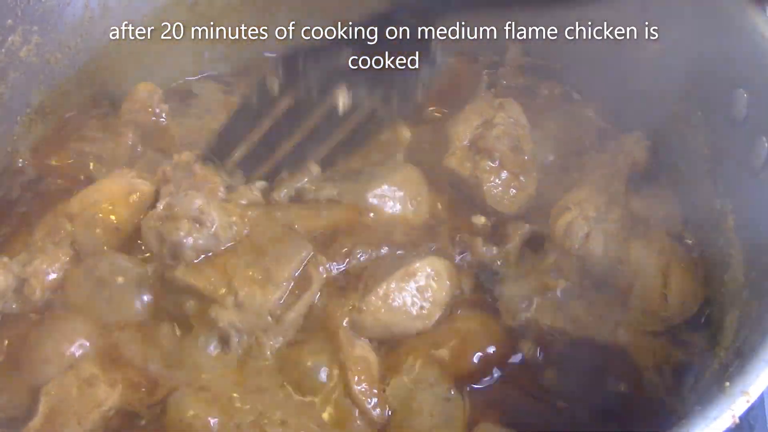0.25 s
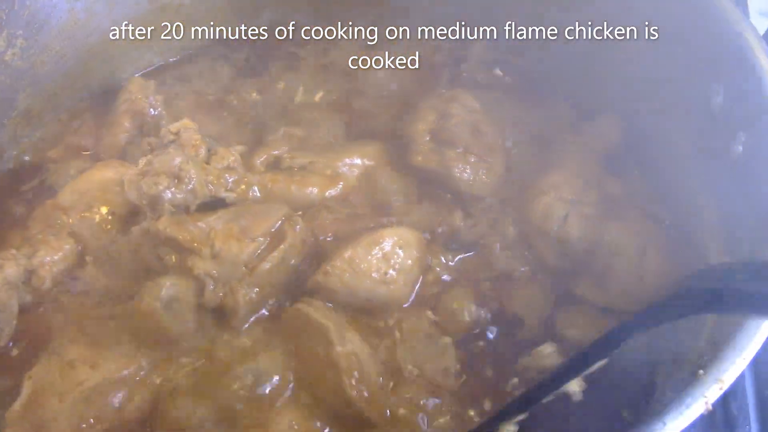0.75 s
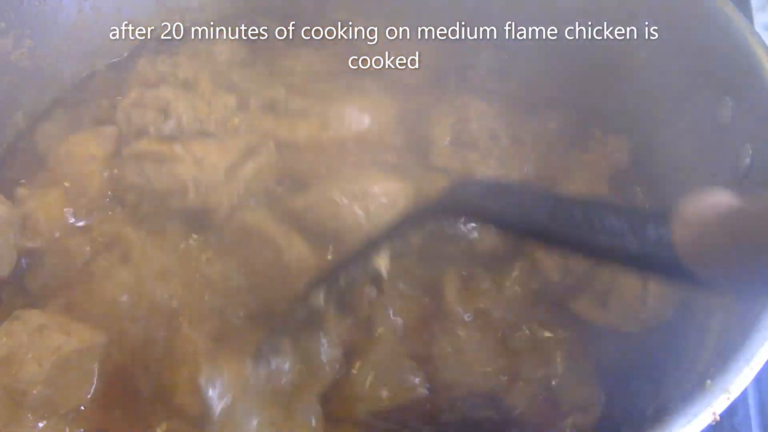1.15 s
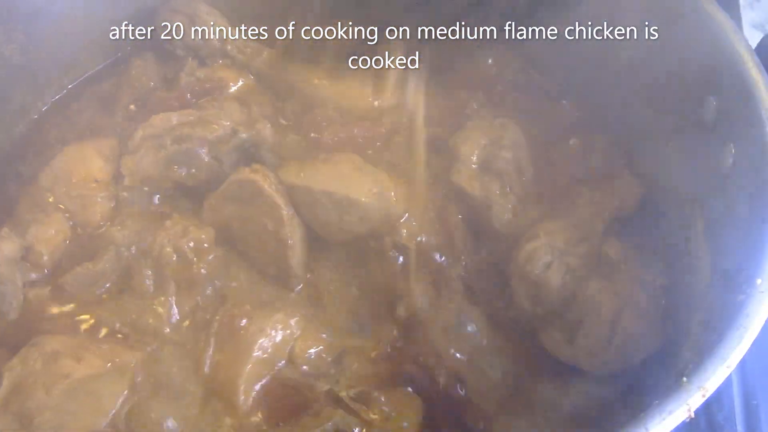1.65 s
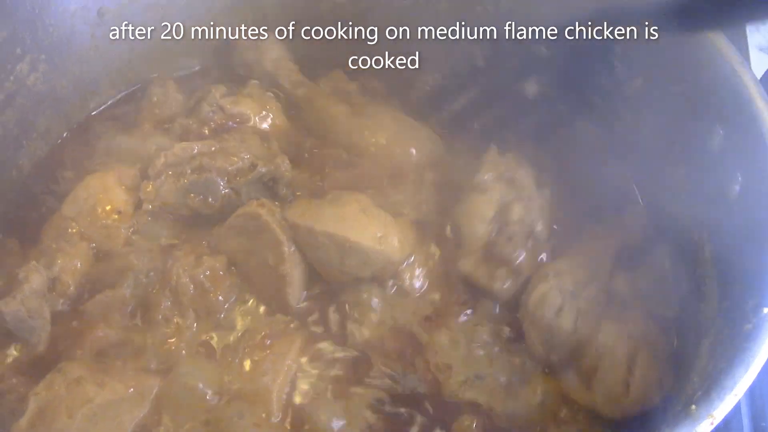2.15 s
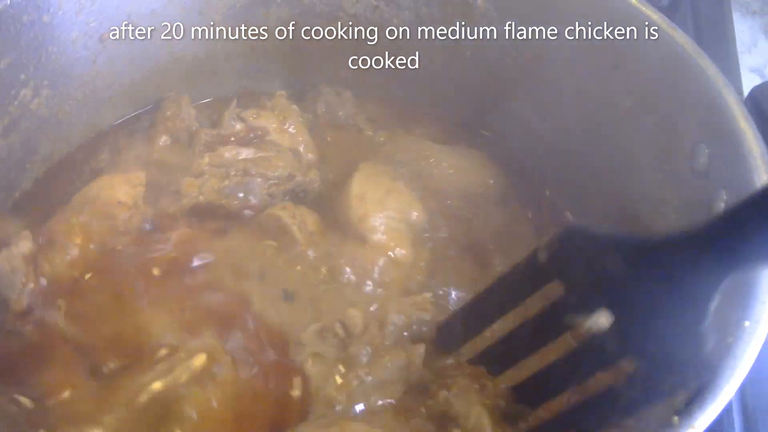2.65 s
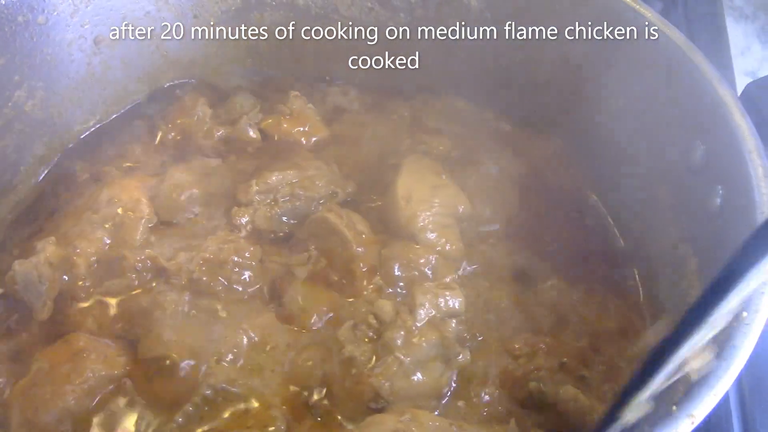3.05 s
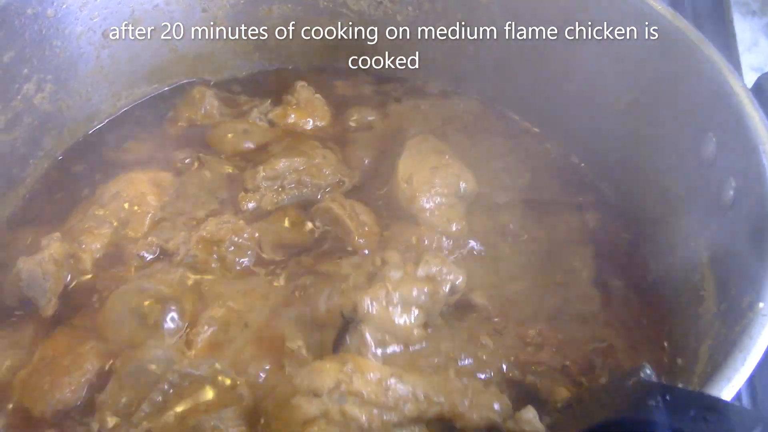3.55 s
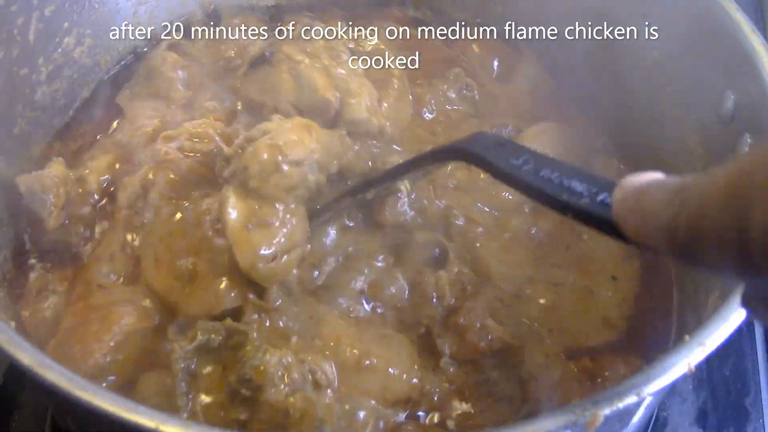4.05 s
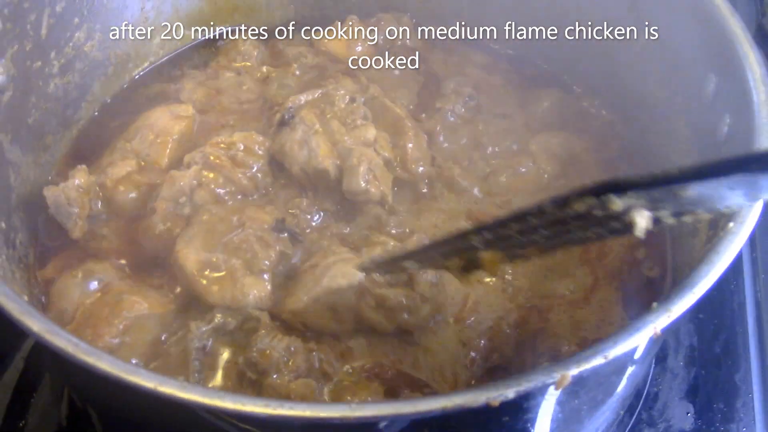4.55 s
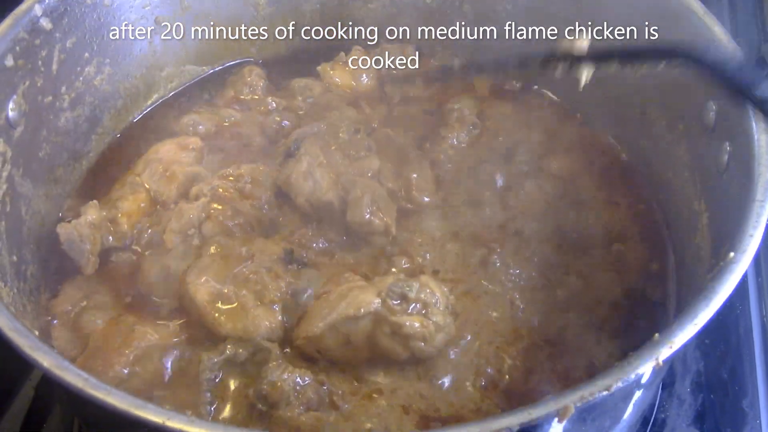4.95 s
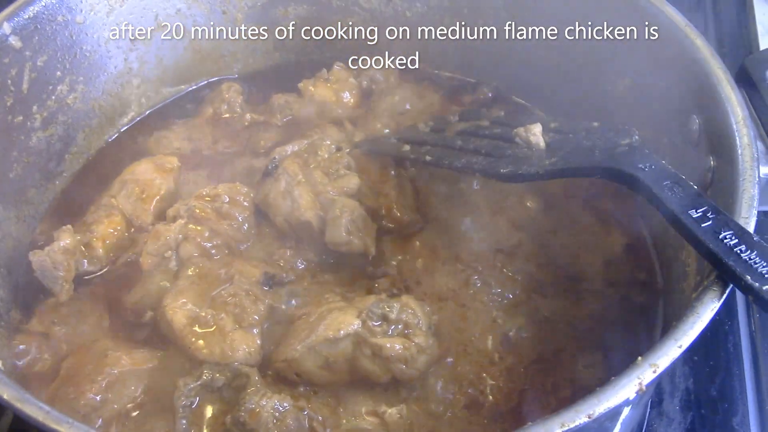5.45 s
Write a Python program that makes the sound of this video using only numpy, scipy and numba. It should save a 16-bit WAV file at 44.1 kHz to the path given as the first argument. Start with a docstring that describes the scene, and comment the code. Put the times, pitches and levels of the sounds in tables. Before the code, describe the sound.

Thick gravy simmers in a deep metal pot close to the microphone. Bubbles burst in short, irregular plops while hot fat snaps, spits and fizzes over a faint steady hiss of flame and kitchen. The boil swells briefly around the middle, then eases. Near the end, something heavy thuds once elsewhere in the kitchen as the pot keeps bubbling.

```python
"""Thick gravy simmers close by in a deep metal pot, over a steady hiss of flame and kitchen.
From the start, steam bubbles burst as short plops, small ones ring the air in the pot,
and hot fat snaps, spits and fizzes. The boil swells between 2.2 and 2.9 s, then eases.
At 5.4 s something heavy thuds elsewhere in the kitchen while the pot simmers on."""
import sys
import numpy as np
from scipy import signal
from scipy.fft import rfft, irfft, next_fast_len
from scipy.io import wavfile
from scipy.ndimage import uniform_filter1d
from numba import njit

SR = 44100
rng = np.random.default_rng(int(sys.argv[2]) if len(sys.argv) > 2 else 0)


def to_wav(sig):
    """Store sig (one row per channel, or 1-D mono) as 16-bit WAV at the path in sys.argv[1].

    Samples outside -1..1 are clipped; the rate is SR.
    """
    pcm = np.clip(np.atleast_2d(sig), -1, 1) * 32767
    pcm = np.round(pcm).astype(np.int16)
    wavfile.write(sys.argv[1], SR, pcm.T)  # frames by channels


N = 251587
T = np.arange(N) / SR

# big bubbles bursting: start_s, peak_db, pitch_hz, length_s
BIG_BUBBLES = [(0.008, -15, 920, 0.0041), (0.017, -5, 1730, 0.0034), (0.088, -7.5, 1120, 0.0057),
               (0.159, -13.5, 696, 0.01), (0.166, -15, 1700, 0.006), (0.176, -15, 960, 0.011),
               (0.333, -13, 685, 0.0079), (0.407, -21, 1120, 0.016), (0.417, -16, 750, 0.012),
               (0.449, -12.5, 1715, 0.0065), (0.502, -11.5, 1123, 0.018), (0.525, -15.5, 1090, 0.015),
               (0.569, -11.5, 1045, 0.012), (0.621, -12.5, 1090, 0.01), (0.833, -17, 2220, 0.005),
               (0.877, -17, 1015, 0.0085), (0.977, -10, 1100, 0.0029), (1.118, -10.5, 1100, 0.0058),
               (1.195, -12, 1170, 0.0058), (1.223, -14, 1230, 0.0071), (1.269, -17.5, 1130, 0.012),
               (1.369, -13.5, 2200, 0.0041), (1.422, -17.5, 1220, 0.0093), (1.564, -20, 1100, 0.039),
               (1.686, -12, 1310, 0.0083), (2.047, -10.5, 920, 0.0046), (2.095, -9, 780, 0.0051),
               (2.118, -16, 705, 0.0088), (2.172, -9, 1580, 0.0082), (2.299, -13, 1060, 0.0063),
               (2.372, -6.5, 760, 0.0072), (2.373, -12.5, 1300, 0.0038), (2.389, -9, 1100, 0.0083),
               (2.432, -8, 1010, 0.0055), (2.496, -4, 1087, 0.0081), (2.788, -9, 970, 0.0065),
               (2.977, -15, 1620, 0.01), (3.04, -24.5, 560, 0.031), (3.109, -15, 870, 0.011),
               (3.229, -11, 1130, 0.0038), (3.235, -18.5, 1040, 0.016), (3.309, -8, 1100, 0.0047),
               (3.321, -18, 1150, 0.0075), (3.352, -18.5, 1290, 0.01), (3.517, -10.5, 980, 0.0033),
               (3.685, -13.5, 755, 0.0098), (3.715, -10, 1660, 0.0039), (3.984, -18.5, 668, 0.013),
               (4.071, -17.5, 1540, 0.0041), (4.137, -20.5, 2150, 0.0075), (4.188, -17.5, 707, 0.017),
               (4.271, -11.5, 1160, 0.006), (4.718, -20.5, 1700, 0.011), (4.909, -12.5, 1250, 0.0039),
               (5.103, -17.5, 1650, 0.0061), (5.124, -20.5, 665, 0.0099), (5.156, -18, 510, 0.0093),
               (5.224, -20, 625, 0.01), (5.264, -21, 1086, 0.022), (5.325, -21, 2220, 0.01),
               (5.689, -14, 1740, 0.0074)]
# fat and droplets snapping: start_s, peak_db, pitch_hz, spray_db
FAT_SNAPS = [(0.0572, -21, 3280, -36), (0.1002, -15, 3450, -26), (0.2691, -12, 4600, -20),
             (0.302, -15, 2750, -26), (0.457, -14.5, 2930, -30), (0.6948, -15, 4000, -43),
             (0.7853, -22.5, 2780, -30), (1.0844, -17, 3200, -22.5), (1.155, -27, 3830, -22),
             (1.2036, -21, 3220, -22), (1.249, -16, 2040, -20), (1.3234, -14.5, 3060, -24),
             (1.3441, -14, 4350, -20.5), (1.486, -17.5, 3080, -46), (1.731, -15, 3770, -28.5),
             (2.017, -15, 2970, -18.5), (2.1581, -19, 2800, -24), (2.175, -16, 3220, -44),
             (2.183, -14, 3450, -26), (2.2646, -13.5, 2980, -27), (2.4374, -14.5, 3070, -23),
             (2.4933, -18, 2680, -28), (2.755, -16, 3300, -27), (2.825, -19, 4600, -21.5),
             (2.9189, -17, 3700, -25.5), (2.985, -16.5, 2800, -48), (3.036, -10.5, 6200, -44),
             (3.2835, -14, 3400, -32), (3.2984, -6.5, 8900, -37), (3.463, -13, 3020, -19.5),
             (4.0185, -9, 2800, -21.5), (4.1581, -24, 2200, -24), (4.2737, -22, 3130, -34),
             (4.6139, -14, 2520, -20), (4.77, -12, 3970, -39), (4.9132, -17, 6840, -13.5),
             (5.0811, -10, 3070, -16.5), (5.1559, -4, 5320, -32), (5.3322, -21, 2800, -40),
             (5.579, -19, 4140, -34), (5.5972, -12, 3880, -15.5), (5.6711, -17, 6260, -42)]
# hot fat spitting: start_s, level_db
FAT_SPITS = [(0.255, -29), (0.352, -22), (0.3718, -14), (0.525, -21), (0.7986, -13.5), (0.933, -22),
             (1.1798, -25), (1.3743, -11), (1.4538, -15.5), (1.5295, -16), (1.5978, -32), (1.698, -20),
             (1.8103, -24), (1.8397, -12.5), (2.2988, -22), (2.872, -12), (2.8944, -19), (3.711, -16.5),
             (4.2206, -22), (4.337, -13.5), (4.9995, -19), (5.037, -21), (5.1254, -16)]


def undb(db):
    return 10 ** (np.asarray(db) / 20)


def unit_rms(x):
    return x / np.sqrt(np.mean(x ** 2))


def equalize(x, curve):
    """Filter by a curve of freq_hz, gain_db."""
    hz, db = np.transpose(curve)
    size = next_fast_len(N)
    bin_hz = np.maximum(np.arange(size // 2 + 1) * SR / size, 1)
    gain = undb(np.interp(np.log(bin_hz), np.log(hz), db))
    return irfft(rfft(x, size) * gain, size)[:N]


def resonate(x, modes):
    """Parallel resonators, one per mode."""
    return sum(undb(db) * signal.lfilter(*signal.iirpeak(hz, hz / width_hz, SR), x)
               for hz, width_hz, db in modes)


@njit
def add_grains(out, start, hz, t60_s, gain, rise, glide):
    """Sines that swell, decay and climb; rise is a share of t60_s, glide a share of hz."""
    for k in range(len(start)):
        n = int(t60_s[k] * SR) + 2
        fall, swell = np.exp(-np.log(1000) / n), np.exp(-1 / (rise * n))
        amp, gap, phase = gain[k], 1., 0.
        for i in range(min(n, len(out) - start[k])):
            out[start[k] + i] += amp * (1 - gap) ** 2 * np.sin(phase)
            amp *= fall
            gap *= swell
            phase += 2 * np.pi * min(hz[k] * (1 + glide * i / n), .45 * SR) / SR
    return out


def grains(start_s, hz, t60_s, peak_db, rise, glide):
    """Sine grains, each envelope scaled to its peak_db."""
    loss = np.log(1000) * rise
    envelope_peak = (2 / (2 + loss)) ** 2 * (loss / (2 + loss)) ** loss
    start = (np.clip(start_s, 0, None) * SR).astype(np.int64)
    hz, t60_s = np.full(len(start), hz), np.full(len(start), t60_s)
    return add_grains(np.zeros(N), start, hz, t60_s, undb(peak_db) / envelope_peak, rise, glide)


def swarm(bursts, count, band_hz, t60_cycles, spread_db, cap_db, scatter_s, rise, glide):
    """Grains crowd round bursts (time_s, weakness), as one sets off its neighbours; a few are loud."""
    lag, pitch, level, decay = rng.random((count, 4)).T
    time_s, weakness = bursts[np.arange(count) % len(bursts)].T
    start_s = time_s + scatter_s * np.log(lag / (1 - lag)) / 2
    low_hz, high_hz = band_hz
    hz = low_hz * (high_hz / low_hz) ** pitch
    db = np.minimum(-spread_db * np.log(level * weakness) / 2, cap_db)
    return unit_rms(grains(start_s, hz, t60_cycles * (.5 + decay) / hz, db, rise, glide))


def plops():
    """Big bubbles: a round tone, plus a breaking neighbour, high torn film and low slumping gravy."""
    start_s, db, hz, length_s = np.transpose(BIG_BUBBLES)
    film_lag, film_pitch, slump_pitch, lag, pitch = rng.random((len(hz), 5)).T
    neighbour = grains(start_s + .005 * lag, hz * (.649 + .7 * pitch), .98 * length_s, db - 11,
                       rise=.22, glide=.32)
    film = grains(start_s + .00194 * film_lag, hz * (1.24 + .66 * film_pitch), .25 * length_s, db - 9,
                  rise=.096, glide=.048)
    slump = grains(start_s, 420 + 350 * slump_pitch, .79 * length_s, db - 11, rise=.077, glide=.22)
    out = neighbour + film + slump
    for onset_s, peak_db, pitch_hz, tone_s in BIG_BUBBLES:
        x = np.linspace(0, 1, int(tone_s * SR))
        envelope = np.sin(np.pi * x ** .62) ** 2  # swell quicker than fade
        tone = envelope * np.sin(2 * np.pi * pitch_hz * tone_s * x * (1 + .013 * (x - 1)))
        i = int((onset_s - .001) * SR)
        out[i:i + len(x)] += undb(peak_db) * tone[:N - i]
    return out


def simmer():
    """Small bubbles, fizz and wet sizzle ring the pot's air; steam hisses out at each big burst."""
    # strength of the boil: time_s, bubbles_db, fizz_db
    boil = [(0.0, -24, -36), (0.89, -31, -40), (1.13, -26, -36.5), (1.27, -30, -35.5), (1.55, -28.5, -37),
            (1.83, -29.5, -35.5), (2.05, -30.5, -37.5), (2.25, -23, -39), (2.5, -26, -31.5),
            (2.68, -23.5, -31.5), (2.84, -26, -36.5), (3.06, -31.5, -40), (3.37, -30.5, -39.5),
            (3.79, -26.5, -36), (4.42, -31, -41), (4.78, -33, -36), (5.05, -33.5, -39.5), (5.43, -29, -37),
            (5.7, -29.5, -36)]
    # air resonances in the pot: centre_hz, width_hz, gain_db
    air_modes = [(698, 87, 4.5), (1100, 191, 6), (1620, 47, 2.5), (2220, 14, 4), (2800, 130, -4),
                 (3820, 150, -14.5), (6840, 920, -10)]
    # simmer colour: freq_hz, gain_db
    colour = [(150, -11.5), (300, -14.5), (500, -11), (1000, -7), (2000, -6.5), (4000, -3), (5200, -6.5),
              (8000, -3), (12000, -10.5), (16000, -15)]
    vent_s = np.array([row[0] for row in BIG_BUBBLES + FAT_SNAPS + FAT_SPITS]) + .004  # steam lags
    vents = np.transpose([vent_s, rng.random(len(vent_s))])
    small_bursts = rng.random((1300, 2)) * [N / SR, 1]
    bursts = np.concatenate([small_bursts, np.repeat(vents, 3, axis=0)])
    bubbles = swarm(bursts, count=5000, band_hz=(297.7, 4940), t60_cycles=7.9,
                    spread_db=4.5, cap_db=8, scatter_s=.018, rise=.23, glide=.12)
    fizz = swarm(bursts, count=9000, band_hz=(2200, 14600), t60_cycles=4.95,
                 spread_db=10.5, cap_db=24.5, scatter_s=.008, rise=.28, glide=.021)
    steam = swarm(vents, count=14000, band_hz=(2780, 15600), t60_cycles=9.3,
                  spread_db=17.5, cap_db=38, scatter_s=.01, rise=.18, glide=.043)
    sizzle = swarm(bursts, count=30000, band_hz=(2500, 15000), t60_cycles=8,
                   spread_db=5, cap_db=14, scatter_s=.045, rise=.2, glide=.03)
    treble = fizz + undb(-6) * steam + undb(-6.5) * sizzle
    time_s, bubbles_db, fizz_db = np.transpose(boil)
    mix = bubbles * undb(np.interp(T, time_s, bubbles_db))
    mix += treble * undb(np.interp(T, time_s, fizz_db))
    return undb(6) * equalize(resonate(mix, air_modes) + undb(-3) * mix, colour)


def snaps():
    """Fat snaps: a pitched tick, a crack, scattered neighbours and a bright spray."""
    start_s, db, hz, spray_db = np.transpose(FAT_SNAPS)
    tick = grains(start_s, hz, 10.9 / hz, db, rise=.27, glide=.028)
    crack = grains(start_s, 8500., .0005, spray_db + 5.5, rise=.071, glide=.049)
    out = tick + crack
    for lag, pitch, spray_lag, spray_pitch in rng.random((len(hz), 5, 4)).transpose(1, 2, 0):
        neighbour_hz = np.minimum(hz * (.32 + 1.04 * pitch), 11000.)
        out += grains(start_s + .007 * (lag - .25), neighbour_hz, 5.6 / hz, db - 6 * lag,
                      rise=.15, glide=.084)
        spray_hz = 5800 + 5500 * spray_pitch ** 1.88
        out += grains(start_s + .0014 * (spray_lag - .3), spray_hz, .0022, spray_db, rise=.11, glide=.038)
    return out


def spits(flurry_s=.015, ticks=14):
    """Hot fat spits flurries of tiny bright ticks, thickest at the start."""
    start_s, db = np.transpose(FAT_SPITS)
    out = np.zeros(N)
    for lag, pitch, decay in rng.random((len(db), ticks, 3)).transpose(1, 2, 0):
        tick_s = start_s + flurry_s * (lag ** 2 - .15)
        t60_s = .0009 + .0018 * decay
        out += grains(tick_s, 5500 * 2.17 ** pitch, t60_s, db - 9.5 - 8 * lag, rise=.18, glide=.04)
    return out


def pot_walls(x, wet_db, t60_s=.045, spots=5):
    """Short scatter between the walls; each spot on the surface has its own echo."""
    t = np.arange(int(.1 * SR)) / SR
    active_spot = np.repeat(rng.integers(0, spots, N // 600 + 1), 600)[:N]
    out = x.copy()
    for spot in range(spots):
        dull = signal.lfilter([1], [1, -.5], rng.standard_normal(len(t)))  # steam, gravy absorb treble
        tail = dull * np.exp(-np.log(1000) * t / t60_s)
        tail /= np.sqrt(np.sum(tail ** 2))
        share = np.clip(uniform_filter1d(1. * (active_spot == spot), size=200), 0, 1)
        out += undb(wet_db) * signal.fftconvolve(x * np.sqrt(share), tail)[:N]
    return out


def thud(start_s=5.429, shake_s=.13, fade_db_per_s=53, release_db_per_s=200):
    """Distant blow: a clean ring sinks under room rumble and rattle; the fade is slower while it shakes."""
    # modes of the struck object: centre_hz, width_hz, gain_db
    modes = [(323, 13, 7), (352, 20, -10), (399, 91, 8), (480, 160, 3.5), (575, 120, -7), (668, 26, 8),
             (770, 38, 0), (837, 12, 3)]
    # freq_hz, gain_db
    rumble_colour = [(60, -18), (250, -5.5), (310, -3.5), (1000, -9.5), (3000, -25)]
    rattle_colour = [(250, -8), (600, -2), (1200, -6.5), (4000, -16.5), (7000, -22), (11000, -30),
                     (16000, -54)]
    t = np.clip(T - start_s, 0, None)
    fade_db = fade_db_per_s * np.minimum(t, shake_s) + release_db_per_s * np.maximum(t - shake_s, 0)
    rumble = unit_rms(equalize(resonate(rng.standard_normal(N), modes), rumble_colour))
    rattle = unit_rms(equalize(rng.standard_normal(N), rattle_colour))
    ring = sum(undb(db) * np.sin(2 * np.pi * (hz * t + .38 * rng.random())) for hz, _, db in modes)
    ring = unit_rms(ring * (t > 0)) * np.sqrt(np.mean(t > 0))  # rms 1 after the blow
    body = ring * np.exp(-t / .072) + undb(1.5) * rumble
    swell = lambda attack_s: np.sin(np.pi / 2 * np.clip(t / attack_s, 0, 1)) ** 2
    blow = body * swell(attack_s=.0045) + undb(-9.5) * rattle * swell(attack_s=.017)
    return undb(-9.5 - fade_db) * blow


def kitchen_hiss(level_db=-39.5):
    """Steady noise of flame and kitchen."""
    # noise spectrum: freq_hz, density_db
    spectrum = [(20, -18), (60, -10), (105, 2.5), (250, 5.5), (500, 4.5), (1100, 3), (2000, -21),
                (4000, -15.5), (8000, -22), (16000, -42)]
    return undb(level_db) * unit_rms(equalize(rng.standard_normal(N), spectrum))


def scene():
    """Pot, thud and background in mono."""
    pot = pot_walls(simmer() + snaps() + spits(), wet_db=-8.5)
    pot += pot_walls(plops(), wet_db=-12)
    hiss = kitchen_hiss()
    return (pot + thud() + hiss)[None]


def record(dry, ceiling=.9, low_hz=240, top_hz=16000):
    """A phone rounds the highest peaks and cuts bass and top."""
    soft = dry / (1 + np.abs(dry / ceiling) ** 4) ** .25
    highpass = signal.butter(4, low_hz, "high", fs=SR, output="sos")
    lowpass = signal.ellip(10, .2, 80, top_hz, fs=SR, output="sos")
    thin = signal.sosfilt(highpass, soft) + undb(-18) * soft
    return signal.sosfilt(lowpass, thin)


dry = scene()
out = record(dry)
to_wav(out)
```